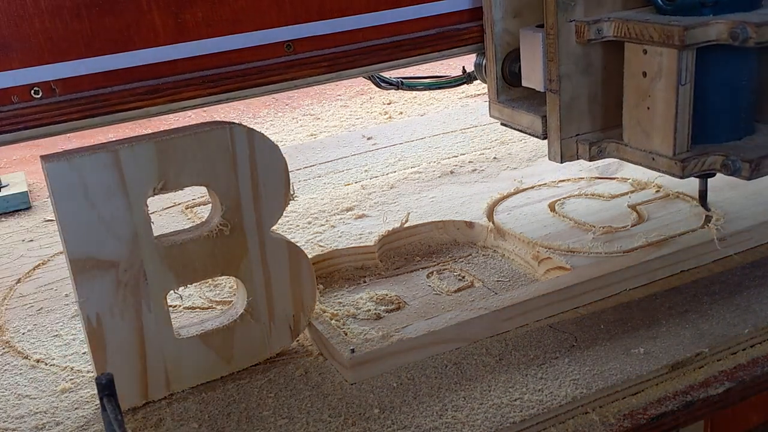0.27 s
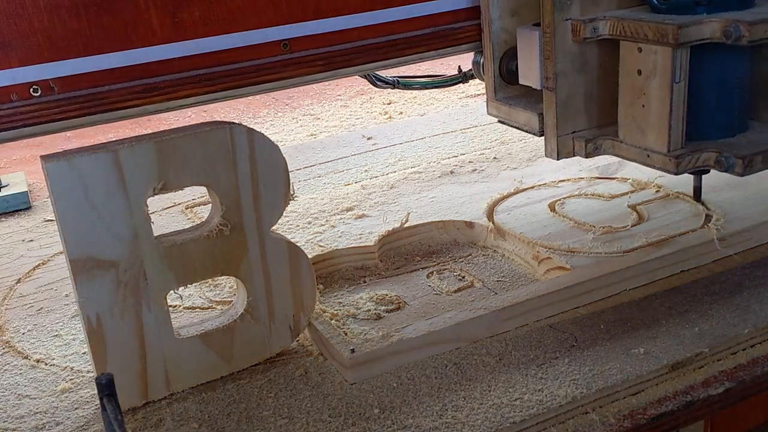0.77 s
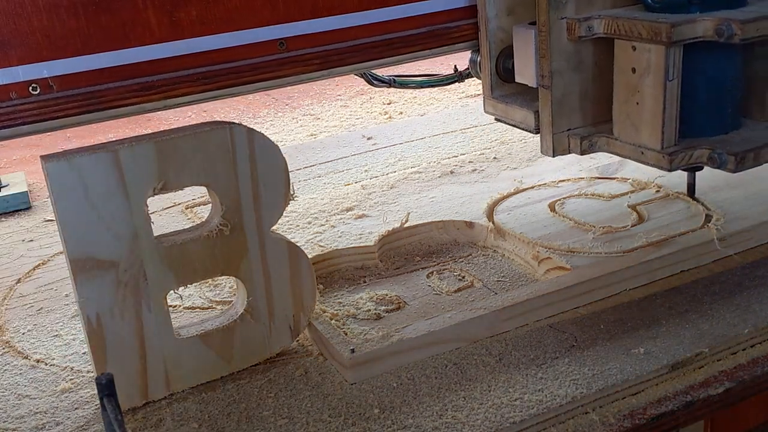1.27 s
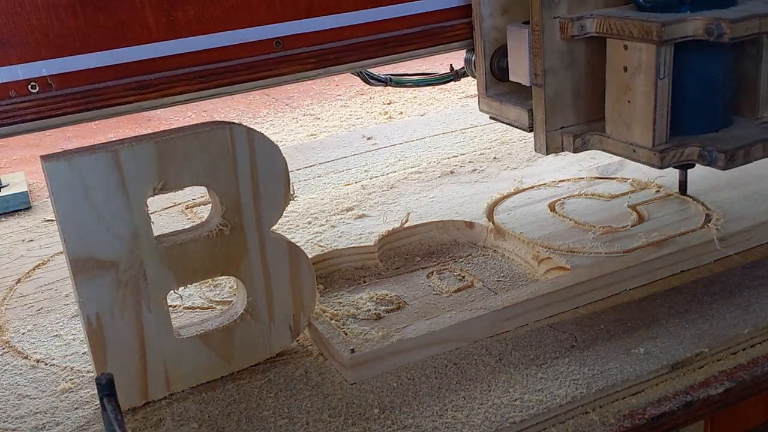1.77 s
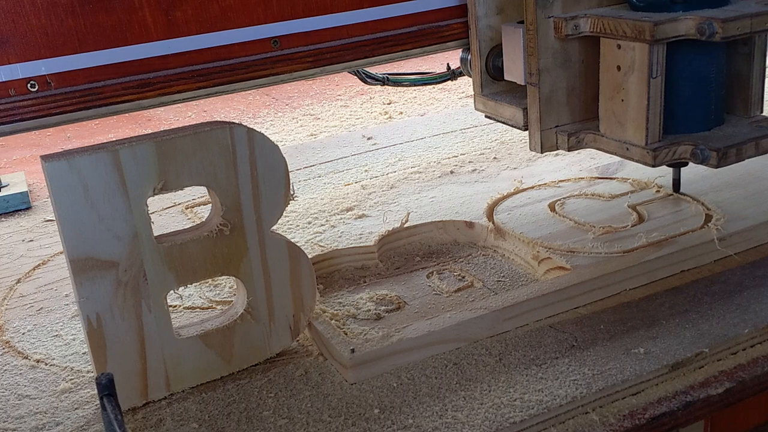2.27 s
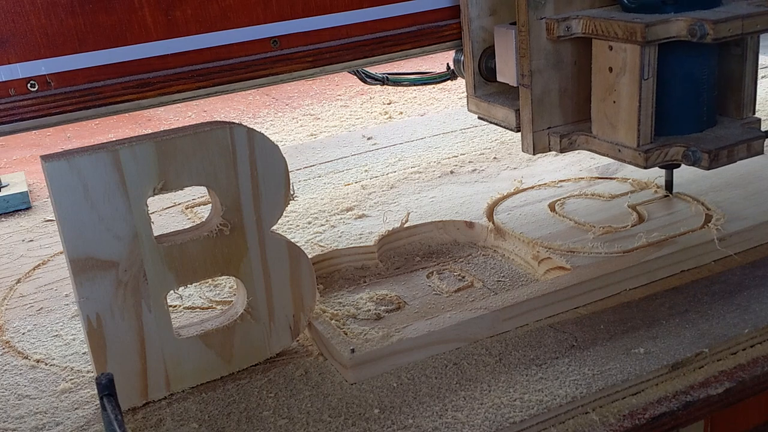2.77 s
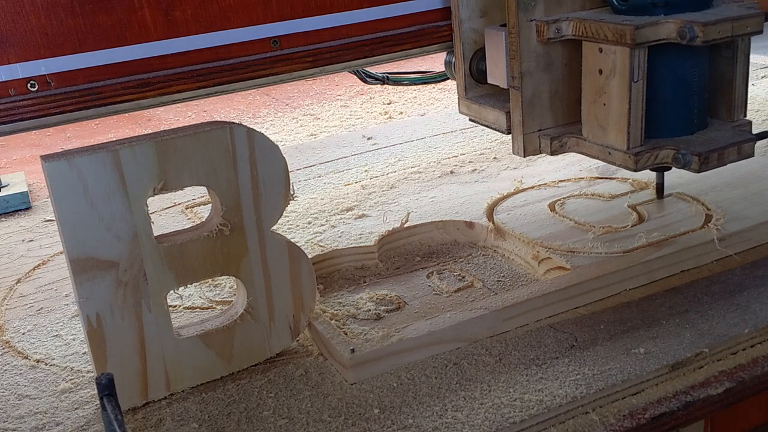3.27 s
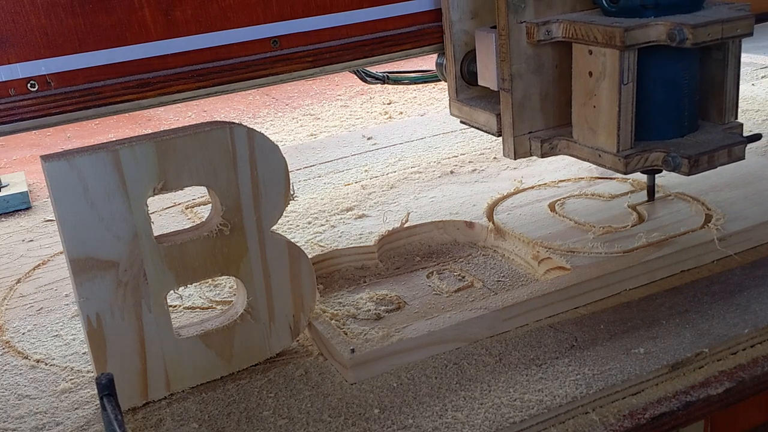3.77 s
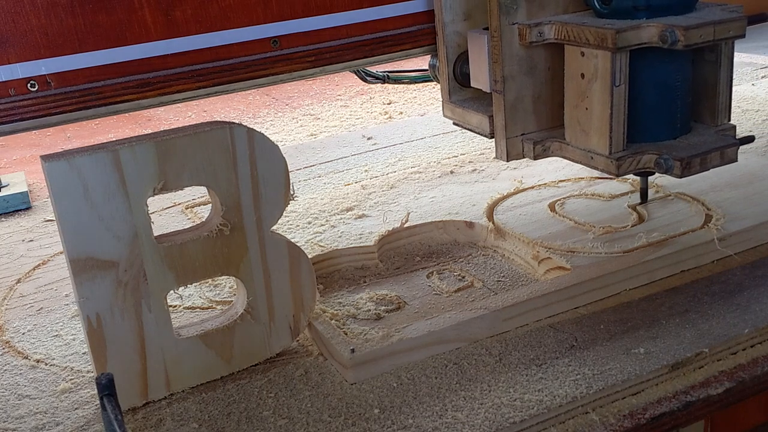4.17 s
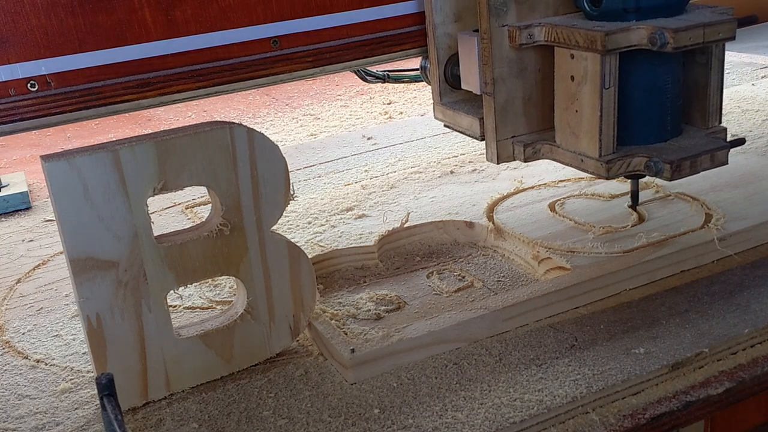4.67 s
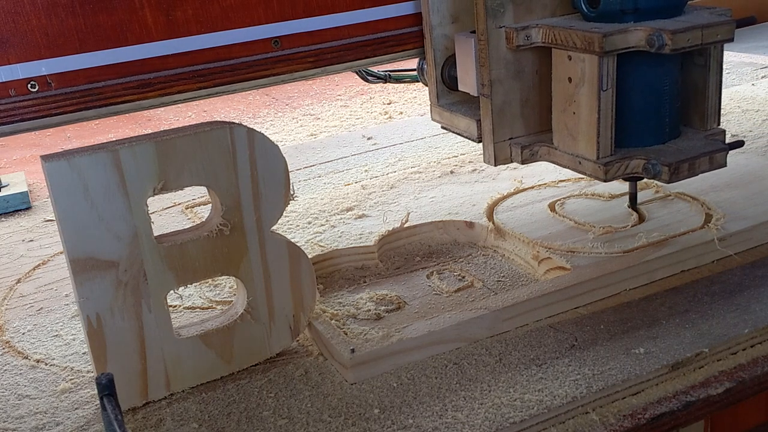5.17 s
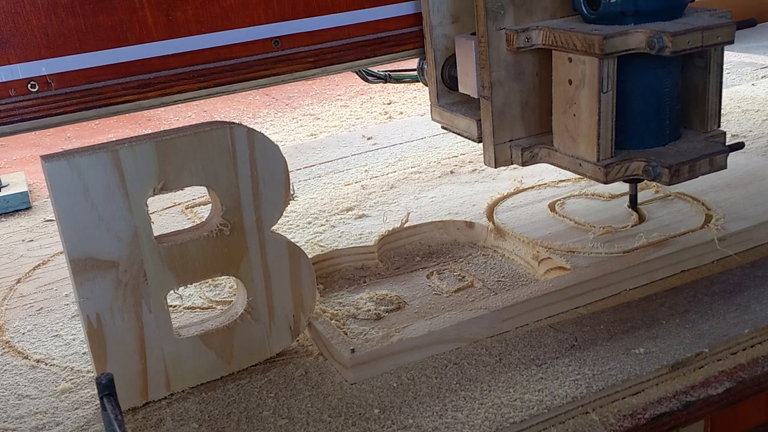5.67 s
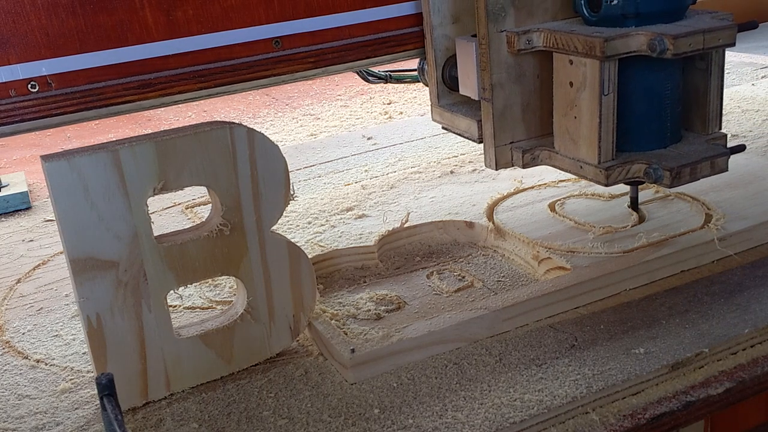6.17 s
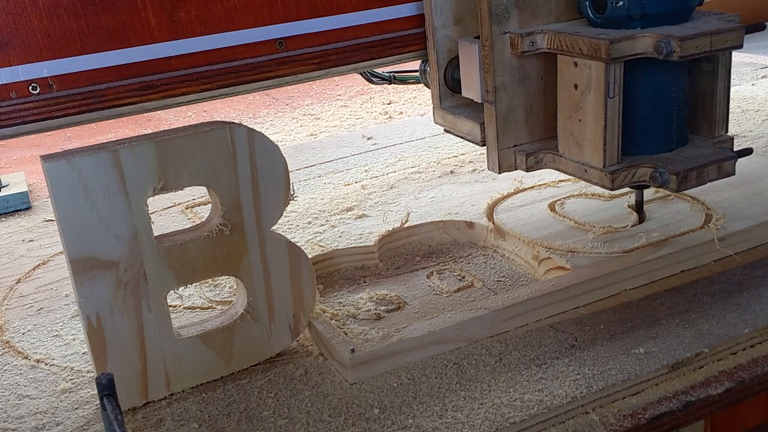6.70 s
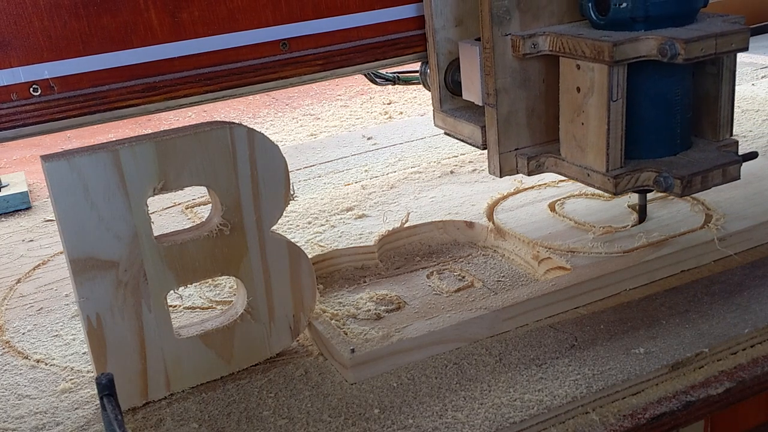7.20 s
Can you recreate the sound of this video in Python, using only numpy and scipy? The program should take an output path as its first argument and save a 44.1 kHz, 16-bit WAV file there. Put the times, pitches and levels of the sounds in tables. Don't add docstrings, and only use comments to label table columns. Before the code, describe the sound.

Close, continuous electric router whine with buzzing, rasping wood cutting and airy hiss, gliding slightly upward before easing back down at the end.

```python
import sys
import numpy as np
from scipy import signal
from scipy.fft import rfft, irfft, next_fast_len
from scipy.io import wavfile
from scipy.ndimage import uniform_filter1d, map_coordinates

SR = 44100
rng = np.random.default_rng(int(sys.argv[2]) if len(sys.argv) > 2 else 0)


def wrap_up_sound(samples):
    columns = np.atleast_2d(samples).T
    tamed = np.clip(columns, -1, 1)
    steps = np.round(tamed * 32767).astype(np.int16)
    wavfile.write(sys.argv[1], SR, steps)


def natural_amplitude(level_db):
    exponent = np.asarray(level_db, float) / 20
    return 10 ** exponent


N = 328085

# time in seconds, shaft turns in Hz.
SHAFT_SPEED = [(0, 485.4), (.22, 489.2), (.5, 485.3), (.63, 486.2), (.88, 483.5), (1.13, 489.9),
               (2.39, 520.6), (2.55, 522), (3.27, 525.3), (3.65, 527.7), (4.16, 532.3), (4.81, 537),
               (5.37, 551.7), (5.67, 552.8), (6.17, 552.1), (6.42, 545.4), (6.93, 534.3), (7.44, 527.1)]

# time in seconds, level in dB.
HUM_FIRST_PORT = [(0, -20), (.8, -14.5), (1.01, -16.5), (1.2, -18.5), (1.51, -17), (1.76, -25), (2.01, -21),
                  (2.14, -26.5), (2.64, -16), (3.27, -15.5), (3.5, -21.5), (4.2, -18), (4.9, -23),
                  (5.42, -17.5), (6.1, -13), (6.45, -16.5), (6.8, -23.5), (7.44, -18.5)]
# time in seconds, level in dB, lead of the first port in radians.
HUM_SECOND_PORT = [(.2, -28, 0), (.5, -19.5, -0.07), (.95, -15.5, -0.15), (1.24, -26.5, -0.5),
                   (1.45, -19.5, -2.5), (2.02, -16.5, -6), (2.37, -22, -5.5), (2.62, -16, -6.5),
                   (3.27, -15.5, -6.5), (3.5, -19.5, -6.5), (4.4, -21.5, -6.5), (4.72, -17, -6.5),
                   (5.1, -20.5, -5.5), (5.42, -12, -6.5), (6.19, -10, -6.5), (6.45, -16, -6.5),
                   (6.93, -16.5, -6), (7.15, -22, -6)]
# time in seconds, change at first port in dB, change at
# second port in dB, extra lead in radians, length in seconds.
HUM_SHIFTS = [(0.26, 0.4, 1.0, -0.02, 0.8), (0.34, -1.5, -1.3, -0.2, 0.12), (0.64, -1.8, -1.6, -0.09, 0.12),
              (0.92, -1.7, -0.8, -0.07, 0.12), (1.04, 0.5, 1.5, 0.05, 0.12),
              (1.28, -0.6, -0.2, -0.73, 0.12), (1.42, -0.3, 1.0, 0.3, 0.12), (1.48, -1.3, -4.1, 0.45, 0.17),
              (1.56, 0.3, -1.4, -0.29, 0.12), (1.86, 1.6, -2.3, -0.29, 0.25), (2.18, 1.2, 0.2, 0.5, 0.25),
              (2.36, 3.0, -2.8, -0.17, 0.35), (2.44, -0.7, 0.4, -0.46, 0.12), (2.8, -1.0, -0.6, 0.07, 0.17),
              (3.12, 0.6, -0.7, 0.09, 0.8), (3.6, 0.8, 1.0, -0.13, 0.17), (4.02, -1.6, -1.4, -0.04, 0.12),
              (4.96, 1.4, 0.7, 0.33, 0.12), (5.2, 1.7, -3.7, -0.85, 0.35), (5.6, 1.5, -0.6, -0.06, 0.5),
              (5.7, 0.9, 0.8, -0.01, 0.12), (6.12, -0.4, -0.7, -0.18, 0.12), (6.22, 1.0, 0.7, 0.01, 0.12),
              (6.36, -0.3, -1.8, -0.1, 0.12), (6.6, 1.4, -1.0, 0.52, 0.35), (6.88, -2.0, -0.3, -0.15, 0.12),
              (6.96, 2.9, -0.9, -0.47, 0.17), (7.14, -2.1, -2.3, 0.22, 0.12), (7.14, -0.9, 1.6, -0.61, 0.5),
              (7.32, -1.1, 2.6, 0.11, 0.25)]

# shaft speed in Hz, level in dB.
FAN_LEVEL = [(486, -35), (491, -33), (494, -28), (510, -31.5), (524, -32), (530, -29), (534, -36),
             (552, -27)]
# shaft speed in Hz, level in dB.
FAN_OVERTONE_LEVEL = [(485, -44), (490, -39.5), (500, -49), (512, -36), (525, -29), (535, -36.5),
                      (548, -35), (552, -32)]
# time in seconds, swell in dB, length in seconds.
FAN_SWELLS = [
    (0.66, 14, 0.18),
    (1.06, -3, 0.17),
    (1.38, 3, 0.51),
    (1.68, -12, 0.061),
    (3.2, -16, 0.1),
    (3.86, 2.5, 1),
    (4.34, -2, 0.22),
    (4.62, -23, 0.28),
    (5.58, -0.5, 0.33),
]
# time in seconds, swell in dB, length in seconds.
FAN_OVERTONE_SWELLS = [(1.14, -10, 0.08), (1.4, -2.5, 0.065), (1.9, 0, 0.22), (2.3, 9, 0.073),
                       (2.74, 6.5, 0.13), (3.24, -6, 0.21), (4.04, -6, 0.07), (4.48, 9, 0.8),
                       (5.8, -24.5, 0.56), (6.32, -17, 0.21), (6.46, 7, 0.22), (6.64, -3, 0.18),
                       (7.28, 1.5, 0.32)]

# time in seconds, swell in dB, length in seconds.
SECOND_SWELLS = [(0.1, 4.7, 0.17), (0.66, 7, 0.67), (1.12, -9, 0.1), (1.42, -8, 0.14), (1.84, -6, 0.11),
                 (2.04, 3.5, 0.089), (2.08, -6, 0.57), (2.2, -10, 0.11), (2.96, 4.5, 0.38),
                 (3.84, -8, 0.67), (4.0, -15, 0.058), (4.14, 6.5, 0.15), (5.36, 5.5, 0.3),
                 (5.92, 7.5, 0.47), (5.94, -8, 0.16), (6.18, 7.5, 0.18), (6.34, -10, 0.17),
                 (6.48, -4, 0.18), (7.1, -15.5, 0.46), (7.12, 11.5, 0.22)]
# time in seconds, swell in dB, length in seconds.
THIRD_SWELLS = [(0.04, -11, 0.15), (0.3, 8, 0.25), (0.8, 3, 0.34), (1.2, 6, 0.67), (1.76, 5.0, 0.12),
                (1.9, -13.5, 0.16), (2.14, -7.5, 0.15), (2.3, 5.5, 0.18), (2.46, 6.5, 1), (2.5, -5.1, 0.15),
                (2.68, 4, 0.16), (3.12, -20, 0.11), (3.88, -13, 0.37), (4.24, 11, 0.094),
                (4.52, -9.5, 0.64), (5.44, -1.5, 0.69), (6.1, 6, 0.22), (6.48, -7, 0.079), (6.82, -5, 0.27),
                (7.24, 4, 0.88)]
# time in seconds, level of the upper orders in dB.
BITE_DEPTH = [(0, -23.5), (.4, -23.5), (1.1, -25.5), (1.55, -21), (2.4, -27.5), (2.8, -24), (3.2, -28),
              (3.6, -25.5), (4.7, -26.5), (5.2, -29.5), (6.1, -30), (6.35, -20), (6.75, -25), (7.44, -21)]
UPPER_ORDERS = [4, 5, 6, 7, 9, 10, 11, 12, 13, 14, 15, 17, 18]
UPPER_LEVELS = [-6.5, -5, -10, -10, -9, -13.5, -15, -15.5, -18.5, -17.5, -22, -43, -21.5]

# time in
# seconds, multiple of shaft speed, swell in dB, length in seconds.
ORDER_SWELLS = [(0.0, 4, -3.2, 1.2), (0.22, 5, -6.4, 0.5), (0.56, 5, -6.2, 0.12), (0.74, 5, 7.5, 0.12),
                (0.82, 4, 5.6, 0.18), (1.22, 4, -7.9, 0.12), (1.28, 5, 10.4, 0.12), (1.36, 4, 4.8, 0.18),
                (1.44, 5, -6.5, 0.12), (1.54, 4, -3.8, 1.2), (1.78, 4, 5.7, 0.18), (1.86, 5, -9.6, 0.8),
                (2.02, 4, -8.4, 0.12), (2.26, 4, -6.4, 0.12), (2.72, 4, 3.3, 0.8), (3.34, 4, -8.9, 0.12),
                (3.38, 5, -2.2, 1.2), (3.6, 4, 8.8, 0.25), (3.66, 5, 7.3, 0.12), (3.82, 5, -11.2, 0.8),
                (4.54, 4, -7.5, 0.12), (5.08, 4, -11.2, 0.18), (6.22, 4, 6.5, 0.12), (6.46, 5, -5.6, 0.35),
                (6.54, 4, -5.4, 0.25), (6.92, 4, 7.7, 0.18), (6.94, 5, 8.3, 0.35), (7.42, 5, -11.2, 0.12),
                (0.26, 10, 5.6, 0.25), (0.28, 9, 6.7, 0.12), (0.28, 11, 10.1, 0.12), (0.28, 13, -7.6, 0.5),
               (0.46, 9, -7.9, 0.25), (0.8, 13, 8.3, 0.25), (1.14, 10, 3.8, 1.2), (1.16, 12, -6.7, 0.25),
               (1.34, 9, -8.3, 0.12), (1.52, 9, -6.7, 0.12), (1.74, 12, 6.7, 0.5), (2.08, 10, 8.1, 0.12),
               (2.22, 9, -8.8, 0.12), (2.74, 11, -7.4, 0.12), (2.76, 12, -11.2, 0.18),
               (3.24, 12, 6.1, 0.25), (3.26, 10, 7.3, 1.2), (3.3, 13, 11.2, 0.12), (3.58, 12, 8.1, 0.18),
               (3.62, 11, 4.6, 1.2), (3.64, 9, 9.0, 0.12), (3.9, 9, 11.2, 0.12), (4.22, 11, 6.0, 0.25),
               (4.28, 10, 4.0, 0.8), (5.28, 9, -6.2, 1.2), (5.28, 12, -10.3, 0.18), (5.3, 11, -5.0, 0.8),
               (5.36, 13, -5.4, 0.8), (6.2, 12, -7.7, 1.2), (6.36, 9, -11.2, 0.12), (6.48, 12, -6.9, 0.18),
               (6.56, 9, -9.7, 0.12), (6.6, 11, -7.5, 0.12), (6.76, 12, 11.1, 0.12), (6.88, 9, 6.6, 0.35),
               (7.04, 9, -8.6, 1.2), (7.08, 10, -8.0, 0.12), (7.14, 11, -8.3, 0.12), (7.3, 12, 7.8, 0.12),
               (7.38, 9, -6.9, 0.18), (7.42, 11, 3.2, 1.2),
                (0.08, 3, 5.3, 0.1), (0.08, 8, -7.3, 0.1), (0.18, 8, 6.6, 0.1), (0.26, 8, -6.6, 0.1),
              (0.3, 2, -5.1, 0.15), (0.36, 8, 8.0, 0.1), (0.48, 2, 4.4, 0.1), (0.54, 3, -2.7, 0.1),
              (0.64, 2, -4.3, 0.1), (0.66, 8, -10.5, 0.15), (1.14, 3, 3.4, 0.1), (1.32, 3, 4.3, 0.1),
              (1.34, 2, -5.5, 0.1), (1.46, 16, 6.9, 0.5), (1.76, 2, -5.3, 0.15), (1.96, 16, 12.0, 0.1),
              (2.0, 3, 3.7, 0.1), (2.04, 16, -6.8, 0.1), (2.26, 8, -4.0, 0.33), (2.44, 16, -4.7, 0.22),
              (2.76, 2, 4.3, 0.1), (2.78, 8, 6.7, 0.1), (2.82, 3, -6.3, 0.15), (2.82, 16, -4.6, 0.1),
              (3.14, 3, 8.4, 0.1), (3.28, 3, -6.3, 0.1), (3.3, 8, 3.6, 0.33), (3.5, 3, 3.1, 0.22),
              (3.54, 2, -6.3, 0.1), (3.78, 3, -2.6, 0.15), (3.88, 3, 9.4, 0.1), (3.94, 16, 8.0, 0.1),
              (4.02, 3, 5.3, 0.33), (4.2, 16, 6.6, 0.1), (4.26, 3, -5.0, 0.1), (4.66, 2, -3.0, 0.22),
              (4.68, 8, 7.3, 0.33), (4.76, 3, 4.8, 0.15), (4.96, 16, 10.0, 0.1), (5.22, 8, -5.6, 0.5),
              (5.22, 16, 7.0, 0.1), (5.62, 3, 5.2, 0.1), (5.72, 16, 11.5, 0.5), (5.94, 8, -6.7, 0.33),
              (6.22, 3, -3.7, 0.1), (6.34, 16, 8.3, 0.15), (6.68, 8, 3.7, 0.5), (6.9, 16, 10.4, 0.1),
              (7.38, 8, -5.4, 0.1), (7.42, 2, -6.9, 0.1),
                (0.22, 6, 10.7, 0.25), (0.26, 7, 7.9, 0.12), (0.38, 8, -5.6, 0.18), (0.5, 6, -11.2, 0.12),
                  (0.54, 7, -8.8, 0.12), (0.64, 8, -11.2, 0.18), (0.66, 7, 7.1, 0.8), (0.7, 6, 8.3, 0.12),
                  (0.7, 7, 5.2, 0.12), (1.24, 7, -6.9, 0.12), (1.28, 6, -6.3, 0.12), (1.6, 8, -5.3, 0.12),
                  (1.92, 7, -7.9, 1.2), (2.1, 7, 5.9, 0.18), (2.12, 8, 5.6, 0.18), (2.26, 7, -6.7, 0.12),
                  (2.32, 6, 11.2, 0.12), (2.68, 6, -6.5, 0.25), (2.82, 7, 5.1, 0.25), (3.02, 6, 6.1, 0.25),
                  (3.44, 6, -7.6, 0.12), (3.48, 7, -6.6, 0.12), (3.66, 7, 11.2, 0.12),
                  (3.94, 6, -5.0, 0.18), (4.02, 7, -7.2, 0.12), (4.12, 7, 6.5, 0.12), (4.4, 6, 5.3, 0.8),
                  (4.64, 8, 3.4, 0.8), (5.02, 7, -11.2, 0.18), (5.58, 7, -7.9, 0.18), (5.66, 6, -6.8, 0.18),
                  (5.82, 6, 11.2, 0.12), (6.52, 7, 11.2, 0.12), (6.56, 6, -5.9, 0.12), (6.7, 7, -6.0, 0.18),
                  (7.0, 7, -9.8, 0.12)]

# multiple of shaft speed, level in dB.
CHATTER_ORDERS = [(.5, -17.5), (1.5, -11), (2.5, -10.5), (3.5, -18), (4.5, -13), (5.5, -8), (6.5, -30),
                  (7.5, -26), (8.5, -16)]
# start in seconds, length in seconds, level in dB.
CHATTER_BOUTS = [
    (0.046, 0.24, -40),
    (0.287, 0.34, -29.5),
    (0.75, 0.15, -31),
    (1.585, 0.59, -27.5),
    (2.2, 0.41, -41),
    (5.65, 0.3, -44),
]

# time in seconds, level in dB.
FLOW = [(0, -0.5), (1.3, 0.1), (1.75, 1.1), (2.1, -0.5), (2.22, -0.5), (2.4, 0), (2.9, -1.2), (3.85, -0.4),
        (4.03, -3), (4.25, -2.3), (4.7, -2.5), (5.3, -1), (6, -1), (7.44, -3.5)]
# frequency in Hz, level in dB per Hz.
RASP_SPECTRUM = [(30, -19), (150, -13.5), (300, -17), (420, -12), (600, -10.5), (780, -3.5), (960, 2),
                 (1200, -8), (1500, 0.5), (2000, -18), (4000, -5), (6000, -8.5), (9000, -22.5)]
# frequency in Hz, level in dB per Hz.
HISS_SPECTRUM = [(500, -42), (1900, 2), (2400, 3.5), (3000, -1), (4000, -6), (6000, -11.5), (9000, -4),
                 (11000, -10.5), (13500, -9.5), (14900, -17), (15600, -26)]

# start in seconds, length in seconds, pitch in Hz, level in dB.
FEED_RUNS = [
    (4.2, 0.77, 143, -53),
    (4.8, 1.8, 431, -50),
    (5.85, 0.26, 210, -48),
    (6.753, 0.49, 415, -46.5),
]

# frequency in Hz, share from 0 to 1.
DIRECT_SHARE = [(100, 0.083), (500, 1), (1000, 0.67), (2000, 0.12)]
# frequency in Hz, level difference in dB.
FRONT_TILT = [(3000, 2.5), (6000, -1), (12000, 0)]
# frequency in Hz, share of the other port subtracted.
STEER_SHARE = [(300, .9), (1200, .97), (2400, 1), (4000, .91), (4900, .7), (7500, .68), (8600, .3),
               (12000, .22)]
# frequency in Hz, delay in ms.
STEER_DELAY = [(500, .41), (1280, .395), (2420, .413), (3680, .408), (5000, .404), (6300, .398),
               (8600, .405)]
# time in seconds, share cancelled.
PORT_MATCH = [(0, 0.7), (.6, 0.74), (1.5, 0.77), (1.9, 0.81), (4, 0.73), (7.44, 0.83)]
# frequency in Hz, level in dB.
LEFT_COLOUR = [(40, -9), (150, -4.5), (400, -.6), (600, -.6), (1300, -.2), (2400, -.8), (3700, -.3),
               (8000, -.8), (11000, -5.5), (14500, -11)]


def unit(x):
    return x / np.sqrt(np.mean(np.abs(x) ** 2) + 1e-20)


def along(points, hz):
    f, v = np.transpose(points)
    return np.interp(np.log(hz + 1), np.log(f + 1), v)


def curves(rows):
    s, *columns = np.transpose(rows)
    return [np.interp(np.arange(N) / SR, s, column) for column in columns]


def wobble(rate):
    knots = rng.standard_normal(400)
    coarse = map_coordinates(knots, [np.arange(0, N + 64, 64) * rate / SR])
    ramp = np.arange(64) / 64
    return (coarse[:-1, None] + np.diff(coarse)[:, None] * ramp).ravel()[:N]


def filtered(x, response):
    m = next_fast_len(N + 8192)
    return irfft(rfft(x, m) * response(np.fft.rfftfreq(m, 1 / SR)), m)[..., :N]


def bells(s, length):
    t = np.arange(0, N + 64, 64) / SR
    return t, np.exp(-(2.22 * (t - s[:, None]) / length[:, None]) ** 2)


def bumps(rows):
    s, rise_db, length = np.reshape(rows, (-1, 3)).T
    t, shapes = bells(s, length)
    return np.interp(np.arange(N) / SR, t, natural_amplitude(rise_db @ shapes))


def swell(k):
    rows = ORDER_SWELLS
    return bumps([(s, 0.91 * rise_db, length) for s, multiple, rise_db, length in rows if multiple == k])


def fading(rate, direct):
    return unit(direct + wobble(rate) + 1j * wobble(rate))


def diffuse(hz):
    gap_s = .0004
    direct = np.clip(along(DIRECT_SHARE, hz), 0, 1)
    alike = direct + (1 - direct) * .975 * np.sinc(2 * hz * gap_s)
    return np.arccos(alike) / 2


def order(k, turns, both, apart):
    tone = np.sqrt(2) * np.exp(2j * np.pi * k * turns)
    angle = diffuse(k * 520)
    common = np.cos(angle) * both
    other = np.sin(angle) * apart
    return np.real(tone * np.array([common + other, common - other]))


def hum_shifts():
    s, *change, length = np.transpose(HUM_SHIFTS)
    t, shapes = bells(s, length)
    return [np.interp(np.arange(N) / SR, t, c) for c in np.array(change) @ shapes]


def shaft_hum(turns):
    paths = uniform_filter1d(curves(HUM_FIRST_PORT) + curves(HUM_SECOND_PORT), size=3000, axis=1)
    first_db, second_db, lead = paths + hum_shifts()
    level = natural_amplitude(np.array([first_db + 0.092, second_db + 3.5]))
    phase = 2 * np.pi * turns + np.array([lead, -lead]) / 2
    return level * np.sqrt(2) * np.cos(phase) * natural_amplitude(.4 * wobble(8))


def fan(turns, speed):
    whine_gain = natural_amplitude(along(FAN_LEVEL, speed) - 1.8) * bumps(FAN_SWELLS) * swell(8)
    whine = order(8, turns, fading(30, direct=2.5), (.5 + .9j) * fading(12, direct=2.5))
    overtone_db = along(FAN_OVERTONE_LEVEL, speed) - .1 + 2.2 * wobble(24)
    overtone_gain = natural_amplitude(overtone_db) * bumps(FAN_OVERTONE_SWELLS) * swell(16)
    overtone = order(16, turns, fading(16, direct=4), (.2 + 1.15j) * fading(24, direct=4))
    top_gain = natural_amplitude(-54.5 + 3 * wobble(5))
    top = order(24, turns, fading(30, direct=2.5), -fading(30, direct=2.5))
    return whine_gain * whine + overtone_gain * overtone + top_gain * top


def board_boom(turns):
    second_gain = natural_amplitude(-26) * bumps(SECOND_SWELLS) * swell(2)
    second_turns = turns + .04 * wobble(1.2)
    second = order(2, second_turns, fading(18, direct=8), fading(3, direct=1.2))
    third_gain = natural_amplitude(-26.5) * bumps(THIRD_SWELLS) * swell(3)
    third_turns = turns + .117 + .07 * wobble(1.2)
    third = order(3, third_turns, fading(18, direct=7), 1j * fading(3, direct=3))
    return second_gain * second + third_gain * third


def cutting_edge(turns):
    upper = 0
    for k, db in zip(UPPER_ORDERS, UPPER_LEVELS):
        both = fading(30 + k, direct=1.6)
        apart = 1j * (-1) ** k * fading(20 + k, direct=2)
        upper = upper + natural_amplitude(db) * swell(k) * order(k, turns + .19 * k, both, apart)
    bite_db, = curves(BITE_DEPTH)
    return natural_amplitude(bite_db + 0.1) * upper


def chatter(turns):
    calm_db, edge_s = -46.5, 0.093
    t = np.arange(N) / SR
    gain = natural_amplitude(calm_db)
    for s, length, db in CHATTER_BOUTS:
        inside = np.minimum(t - s, s + length - t)
        gain = gain + natural_amplitude(db) * np.clip(inside / edge_s + .5, 0, 1) ** 2
    half = 0
    for k, db in CHATTER_ORDERS:
        half = half + natural_amplitude(db) * order(k, turns, fading(6, direct=3), 1j * fading(6, direct=2))
    return gain * half


def grain_flicker():
    return natural_amplitude(1.24 * wobble(16))


def rush(spectrum, patchy_db):
    z = signal.stft(rng.standard_normal((2, N)), nperseg=512)[2]
    field = uniform_filter1d(rng.standard_normal(z.shape[1:]), size=6, axis=0)
    field = uniform_filter1d(field, size=12, axis=1)
    pair = signal.istft(z * natural_amplitude(patchy_db * unit(field)), nperseg=512)[1][:, :N]

    def spread(hz):
        return natural_amplitude(along(spectrum, hz)) * [np.cos(diffuse(hz)), np.sin(diffuse(hz))]

    both, apart = filtered(pair, spread)
    return unit(np.array([both + apart, both - apart]))


def chips_and_air(turns):
    flow_db = uniform_filter1d(curves(FLOW)[0], size=2000)
    rasp_db = -26 + 0.85 * flow_db + 0.42 * wobble(5.9)
    rasp = natural_amplitude(rasp_db) * rush(RASP_SPECTRUM, patchy_db=1.3)
    hiss_db = -26 + flow_db + 0.27 * wobble(13)
    hiss = natural_amplitude(hiss_db) * rush(HISS_SPECTRUM, patchy_db=1.5)
    throb = 1 + .12 * np.cos(2 * np.pi * turns)
    return throb * (rasp + hiss)


def sizzle(turns):
    total = 0
    for k in range(19, 28):
        total = total + natural_amplitude(-57.5 + 4 * wobble(3)) * order(k, turns, fading(34, direct=1.5), 1j)
    return total


def feed_motors():
    edge_s = 0.094
    t = np.arange(N) / SR
    total = 0
    for s, length, hz, db in FEED_RUNS:
        gate = np.clip(np.minimum(t - s, s + length - t) / edge_s, 0, 1)
        total = total + natural_amplitude(db) * gate * np.sin(2 * np.pi * hz * t)
    return natural_amplitude(2.7 * wobble(5.8)) * total


def scene():
    speed = uniform_filter1d(curves(SHAFT_SPEED)[0], size=3000)
    turns = np.cumsum(speed * (1 + .00012 * wobble(30))) / SR
    motor = shaft_hum(turns) + fan(turns, speed)
    boom = board_boom(turns)
    edge = cutting_edge(turns)
    rattle = chatter(turns)
    bit = boom + grain_flicker() * edge + rattle
    return motor + bit + chips_and_air(turns) + feed_motors() + sizzle(turns)


def band_limit(x):
    return signal.sosfilt(signal.butter(12, 15420, fs=SR, output="sos"), x)


def record(dry):
    def tilt(hz):
        return natural_amplitude(along(FRONT_TILT, hz) * np.array([[.5], [-.5]]))

    def steer(hz):
        delay_s = along(STEER_DELAY, hz) / 1000
        return np.clip(along(STEER_SHARE, hz), 0, 1) * np.exp(-2j * np.pi * hz * delay_s)

    def colour(hz):
        return natural_amplitude(along(LEFT_COLOUR, hz) * np.array([[1], [0]]))

    ports = filtered(dry, tilt)
    late = filtered(ports[::-1], steer)
    match = np.clip(curves(PORT_MATCH)[0], 0, 1)
    sides = filtered(ports - match * late, colour)
    return band_limit(sides)


dry = scene()
out = record(dry)
wrap_up_sound(out)
```